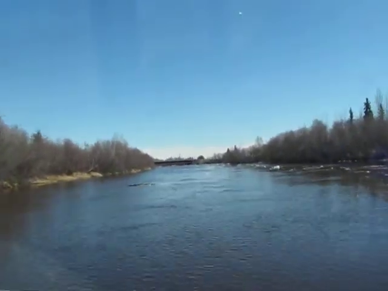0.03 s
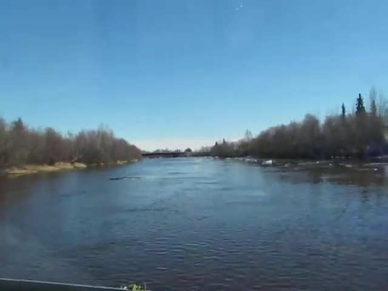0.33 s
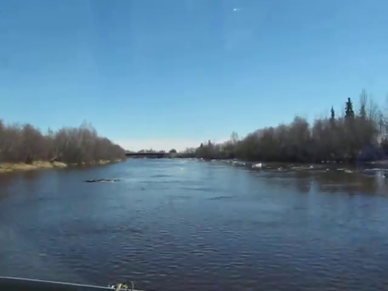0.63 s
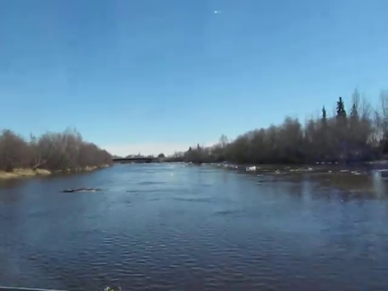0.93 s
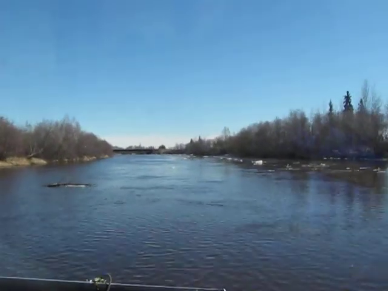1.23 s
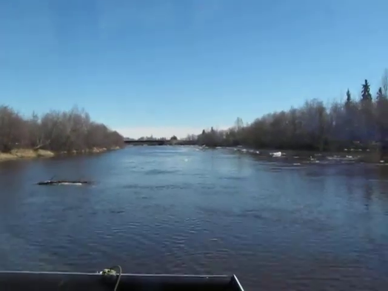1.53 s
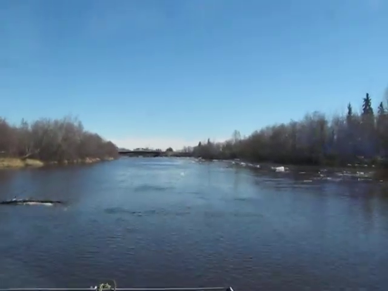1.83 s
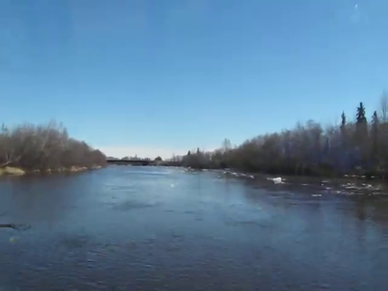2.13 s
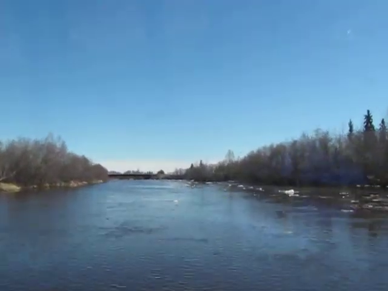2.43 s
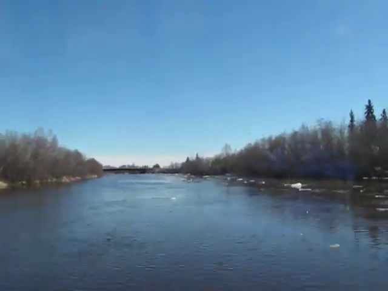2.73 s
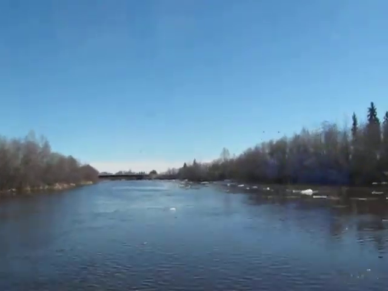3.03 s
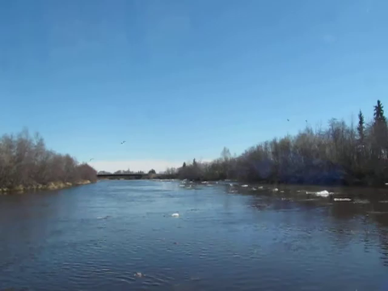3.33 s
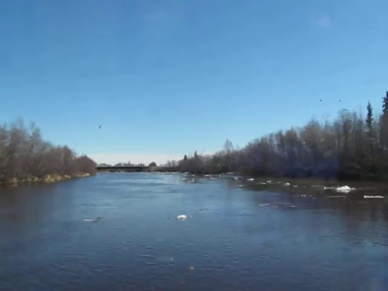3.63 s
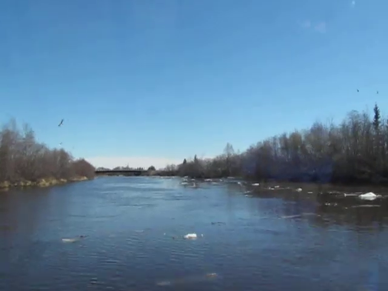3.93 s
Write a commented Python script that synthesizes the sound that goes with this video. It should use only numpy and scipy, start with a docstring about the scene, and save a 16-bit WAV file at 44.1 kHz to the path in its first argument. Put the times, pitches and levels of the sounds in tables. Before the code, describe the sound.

An airboat engine and propeller roar with a distorted rasp, easing slightly past halfway.

```python
"""Airboat engine and propeller, heard on board on a wide river; the throttle eases at about 2.5 s.
Exhaust boom, uneven firings, blade tones and rushing air overload the microphone, so each swing
of the boom chops the rest into a rasp. Hull and wind rumble below; a thin whistle passes briefly.
Near the end the sound skips once with a faint tick."""
import sys
import numpy as np
from scipy import signal
from scipy.fft import rfft, irfft
from scipy.io import wavfile
from scipy.ndimage import uniform_filter1d

SR = 44100
rng = np.random.default_rng(int(sys.argv[2]) if len(sys.argv) > 2 else 0)


def waveform_to_disk(signal):
    """Save audio, clipped to [-1, 1], as 16-bit WAV at the path in sys.argv[1]."""
    frames = np.transpose(np.atleast_2d(signal))
    scaled = np.clip(frames, -1, 1) * 32767
    samples = np.round(scaled).astype(np.int16)
    wavfile.write(sys.argv[1], SR, samples)


N = 176400

# exhaust boom pitch, following engine speed: t/s, f/Hz
BOOM_PITCH = [(0, 152.8), (.6, 150.5), (1, 148.3), (1.5, 147.7), (2.38, 147.8), (2.5, 146), (2.62, 143.6),
              (2.8, 141.5), (3.2, 139.1), (4, 138.2)]
# exhaust boom: t/s, level/dB
BOOM_LEVEL = [(0, 0.5), (.6, -0.5), (1, 0.5), (1.7, .5), (2.35, 1.5), (2.7, -3), (3.1, -5), (3.6, -5),
              (4, -6.5)]
# engine orders: multiple of cycle rate, open-throttle level/dB, eased level/dB
ENGINE_ORDERS = [(6, -27.5, -24), (8, -18, -25), (9, -20.5, -19), (10, -17.5, -19), (13, -25.5, -31.5),
                 (14, -20.5, -24.5), (16, -22.5, -20)]
# growl: t/s, lower-order level/dB, upper-order level/dB
GROWL_LEVELS = [(0, -24, -15.5), (.6, -16, -13.5), (1.4, -17.5, -21.5), (2.3, -17, -14), (2.85, -10, -20),
                (3.199, -9, -20.5), (3.42, -11.5, -13), (3.65, -8.5, -10), (4, -10, -15.5)]
# propeller tones: multiple of blade rate, open-throttle level/dB, eased level/dB
BLADE_TONES = [(2, -19, -23), (3, -20, -19.5), (6, -22.5, -25.5), (7, -28.5, -23.5), (8, -25, -28),
               (10, -39, -23.5), (11, -26.5, -30.5), (13, -26, -27)]
# air torn by the propeller: f/Hz, relative density/dB
WASH_SPECTRUM = [(30, -22.5), (70, -0.5), (130, -3), (230, 2.5), (330, 3.5), (520, -4.5), (800, -5.5),
                 (1400, -5), (2000, -11), (2800, -12.5), (3600, -19), (5200, -20), (7000, -25.5)]
# rushing air: t/s, level/dB
WASH_LEVEL = [(0, -6), (.7, -7), (1.4, -8), (2.2, -8), (3, -10.5), (4, -10.5)]
# whistle: t/s, f/Hz, level/dB
WHISTLE_TRACK = [(1.15, 1035, -50.5), (1.28, 1027, -14.5), (1.45, 1013, -16.5), (1.6, 992, -27.5),
                 (1.7, 988, -36)]
# hull and wind rumble: f/Hz, relative density/dB
RUMBLE_SPECTRUM = [(25, -8.5), (55, 0), (90, -1), (130, -13.5), (300, -40)]
# rumble: t/s, level/dB
RUMBLE_LEVEL = [(0, -19), (2.2, -23.5), (3.2, -19.5), (4, -18)]


def engine(boom_turns, eased):
    """Exhaust boom on order 5, over the lumpy orders of the firing cycle."""
    boom = np.sqrt(2) * np.sin(2 * np.pi * boom_turns) * undb(curve(BOOM_LEVEL) - .3 * walk(20))
    cycle_turns = boom_turns / 5
    throb = growl(cycle_turns)
    firings = undb(.5) * harmonics(cycle_turns, ENGINE_ORDERS, eased, waver_db=2)
    return boom + throb + firings


def growl(cycle_turns, orders=(11, 15), throb_db=1.5, jitter_turns=.05):
    """Two throbbing engine orders that swell as the boom weakens."""
    levels, out = np.array(GROWL_LEVELS), 0
    for column, order in enumerate(orders, 1):
        gain = undb(curve(levels[:, [0, column]]) + throb_db * walk(20))
        phase_turns = order * cycle_turns + rng.random() + jitter_turns * walk(14)
        out += gain * np.sin(2 * np.pi * phase_turns)
    return np.sqrt(2) * out


def propeller(boom_turns, eased, blades_per_boom=3 / 4):
    """Blade-pass tones over a gusty rush of torn air."""
    air = noise(WASH_SPECTRUM) * undb(curve(WASH_LEVEL) + .88 * walk(14))
    return air + harmonics(boom_turns * blades_per_boom, BLADE_TONES, eased, waver_db=1.2)


def whistle():
    """Brief thin whistle, sagging in pitch."""
    times_s, pitch_hz, level_db = np.array(WHISTLE_TRACK).T
    t = np.arange(N) / SR
    gain = np.interp(t, times_s, undb(level_db), left=0, right=0)
    turns = np.cumsum(np.interp(t, times_s, pitch_hz)) / SR
    return np.sqrt(2) * gain * np.sin(2 * np.pi * turns)


def rumble():
    """Low hull and wind noise."""
    return noise(RUMBLE_SPECTRUM) * undb(curve(RUMBLE_LEVEL))


def skip(x, at_s=3.422, gap_s=.0014):
    """A sliver of sound drops out, leaving a tick and a soft thump."""
    at, gap = int(at_s * SR), int(gap_s * SR)
    t = np.arange(N - at) / SR
    tick = undb(-14) * np.exp(-t / .0004)
    thump = undb(-26) * np.exp(-t / .004)
    return np.concatenate([np.zeros(gap), x[:at - gap], x[at:] + tick + thump])


def harmonics(turns, table, eased, waver_db, jitter_turns=.009):
    """Tones of a rotation, levels set by throttle; each wavers alone, high ones more in phase."""
    out = 0
    for multiple, open_db, eased_db in table:
        level_db = open_db + (eased_db - open_db) * eased + waver_db * walk(5.004)
        phase_turns = multiple * (turns + jitter_turns * walk(25)) + rng.random()
        out += undb(level_db) * np.sin(2 * np.pi * phase_turns)
    return np.sqrt(2) * out


def noise(spectrum):
    """Shaped noise, rms 1."""
    points_hz, points_db = np.array(spectrum).T
    bins_hz = np.maximum(np.arange(N // 2 + 1) * SR / N, 1)
    gain = undb(np.interp(np.log(bins_hz), np.log(points_hz), points_db))
    x = irfft(rfft(rng.standard_normal(N)) * gain, N)
    return x / x.std()


def walk(rate_hz):
    """Random steps, smoothed twice; spread near 1."""
    hold = int(SR / rate_hz)
    steps = np.repeat(rng.standard_normal(N // hold + 1), hold)
    return 1.271 * uniform_filter1d(uniform_filter1d(steps, hold), hold)[:N]


def curve(rows):
    """Linear ramps through (t/s, value) rows."""
    return np.interp(np.arange(N) / SR, *np.array(rows).T)


def undb(db):
    """Decibels to gain."""
    return 10 ** (np.asarray(db) / 20)


def low_cut(x, corner_hz):
    """First-order high-pass."""
    return signal.sosfilt(signal.butter(1, corner_hz, "high", fs=SR, output="sos"), x)


def scene():
    """One shaft speed drives engine and propeller."""
    boom_hz = curve(BOOM_PITCH) * (1 + .001 * walk(8))
    boom_turns = np.cumsum(boom_hz) / SR
    open_hz, eased_hz = 141.8, 141.7
    eased = np.clip((open_hz - boom_hz) / (open_hz - eased_hz), 0, 1)
    return (engine(boom_turns, eased) + propeller(boom_turns, eased) + rumble() + whistle())[None]


def record(dry):
    """Microphone clips, its bass cut tilts the flat tops, the amplifier flattens the spikes; dull top."""
    mic_drive_db, mic_bias = 1, .18
    amp_drive_db, amp_bias, output_db = 3, .011, -10.5
    pressure = undb(mic_drive_db) * (dry[0] + mic_bias)
    mic = low_cut(pressure / np.sqrt(1 + pressure ** 2), corner_hz=215)
    amp = np.tanh(undb(amp_drive_db) * mic - amp_bias) + np.tanh(amp_bias)
    line = low_cut(undb(output_db) * amp, corner_hz=28)
    rolloff_hz, stopband_hz, top_hz = 4370, 6750, 15800
    soft = signal.sosfilt(signal.butter(1, rolloff_hz, fs=SR, output="sos"), line)
    narrow = signal.sosfilt(signal.cheby2(12, 70, stopband_hz, fs=SR, output="sos"), soft)
    return signal.sosfilt(signal.ellip(8, .2, 70, top_hz, fs=SR, output="sos"), skip(narrow))[None]


dry = scene()
out = record(dry)
waveform_to_disk(out)
```